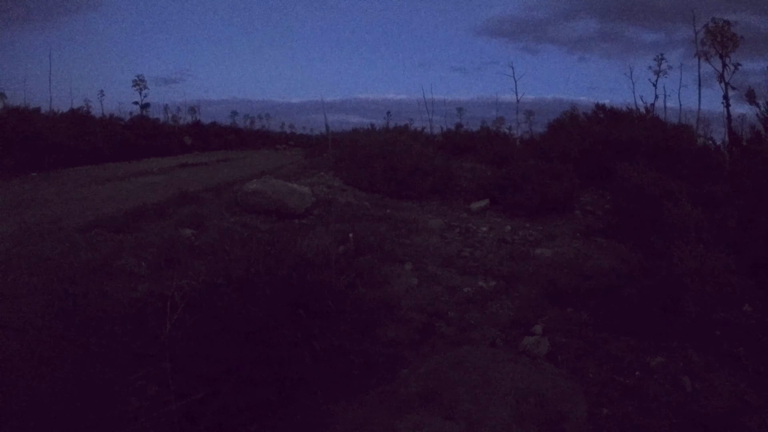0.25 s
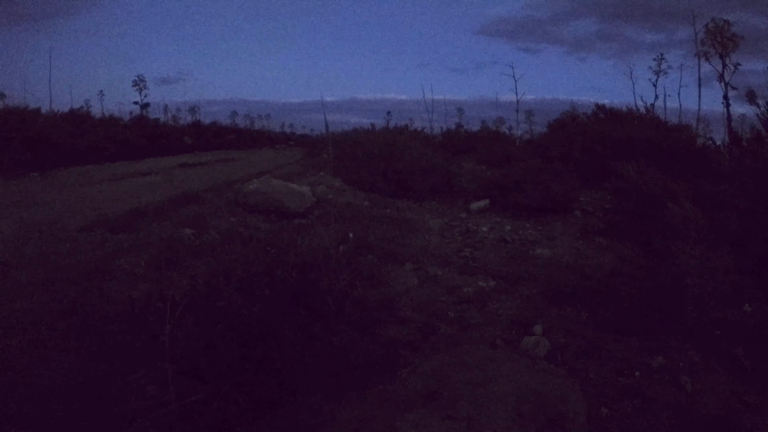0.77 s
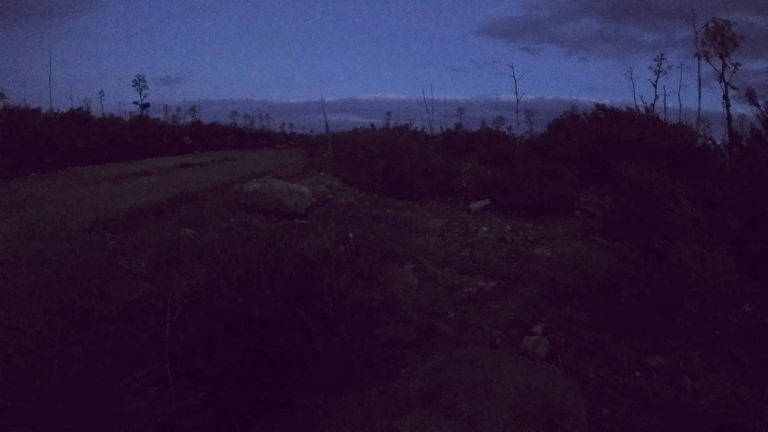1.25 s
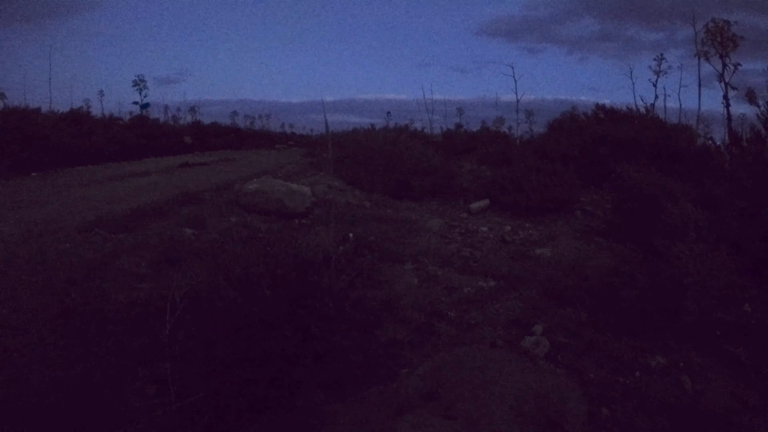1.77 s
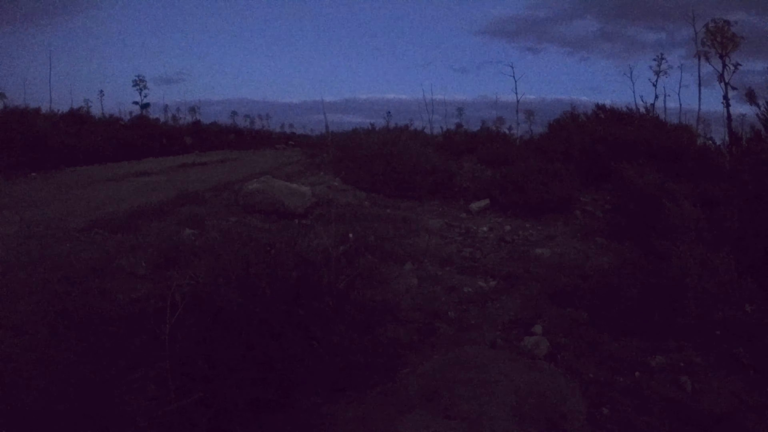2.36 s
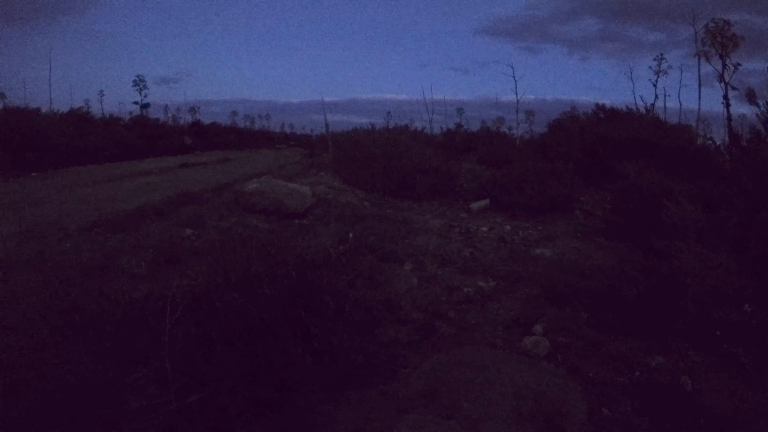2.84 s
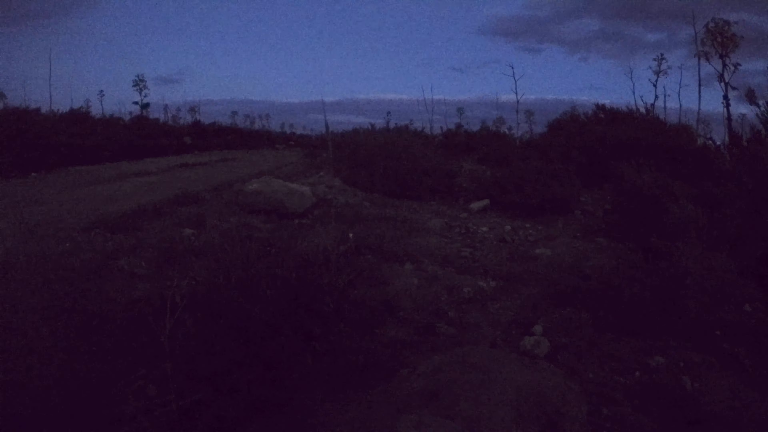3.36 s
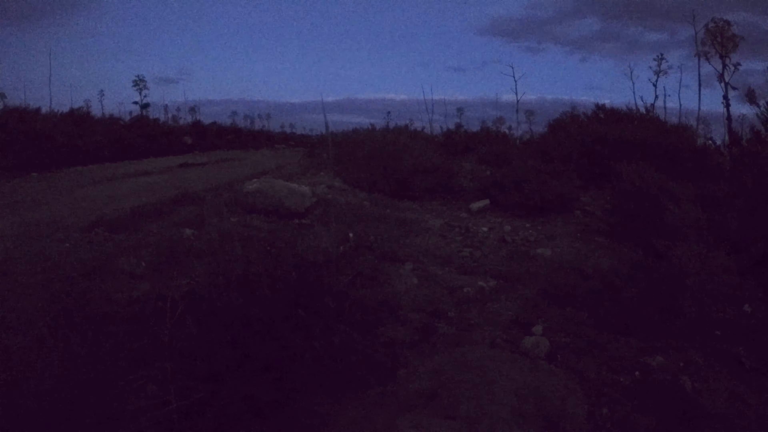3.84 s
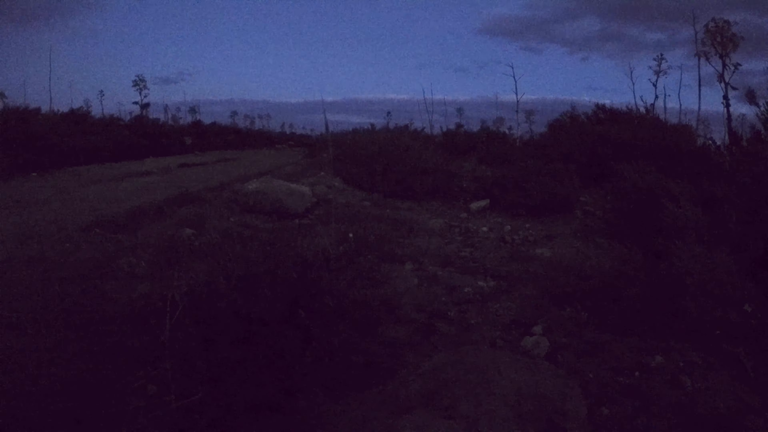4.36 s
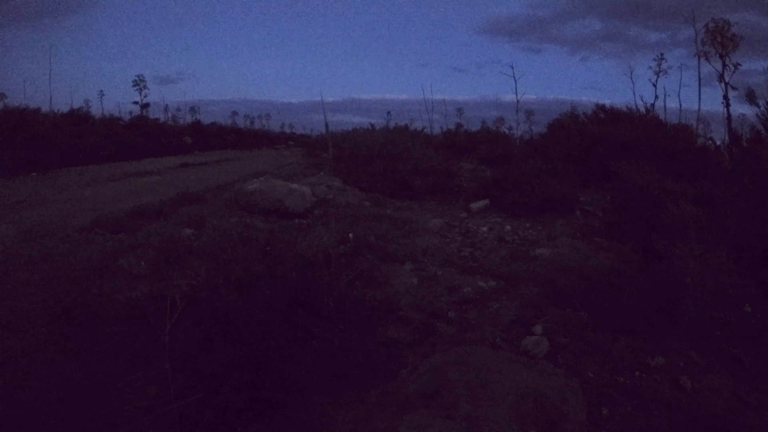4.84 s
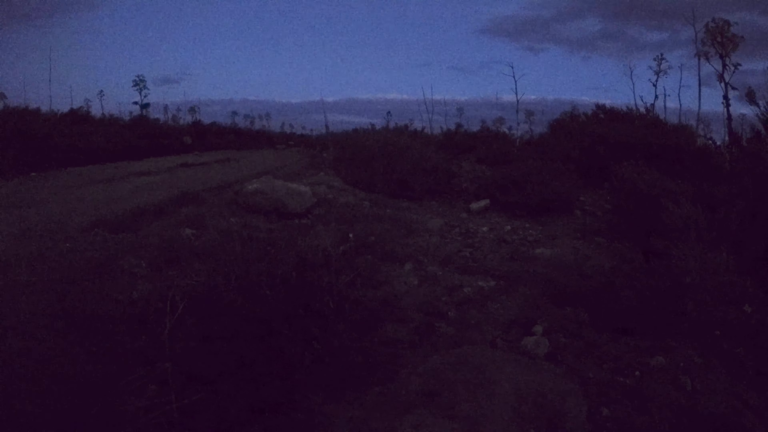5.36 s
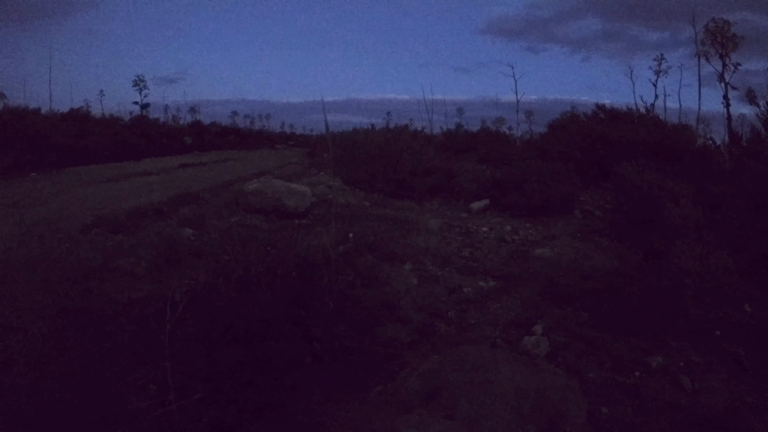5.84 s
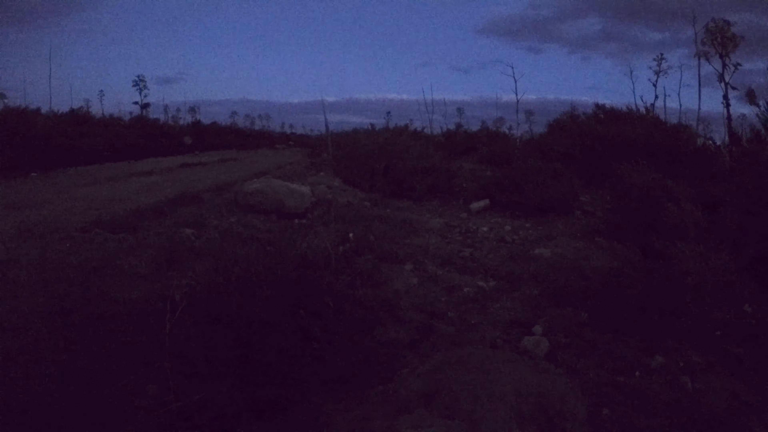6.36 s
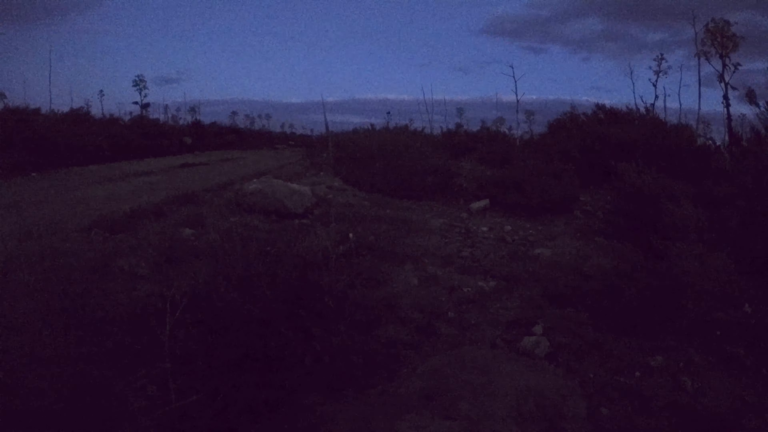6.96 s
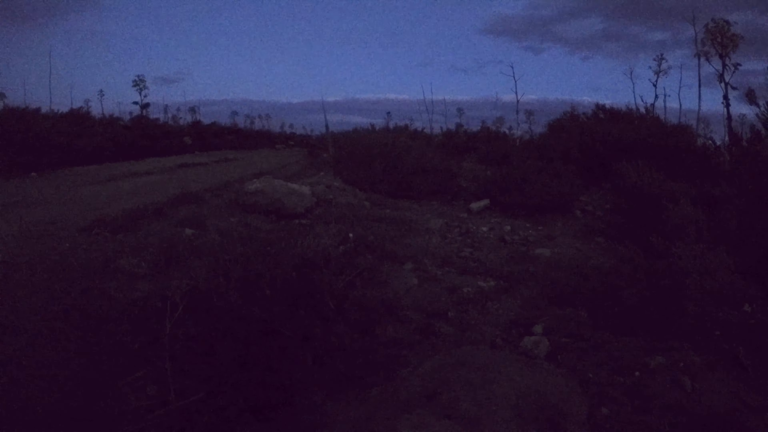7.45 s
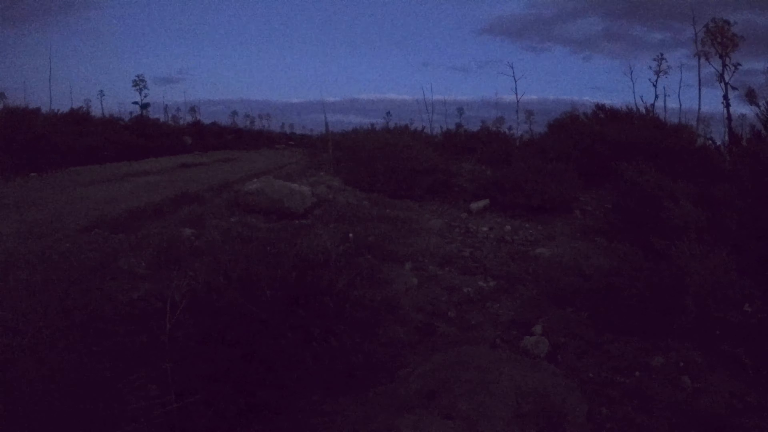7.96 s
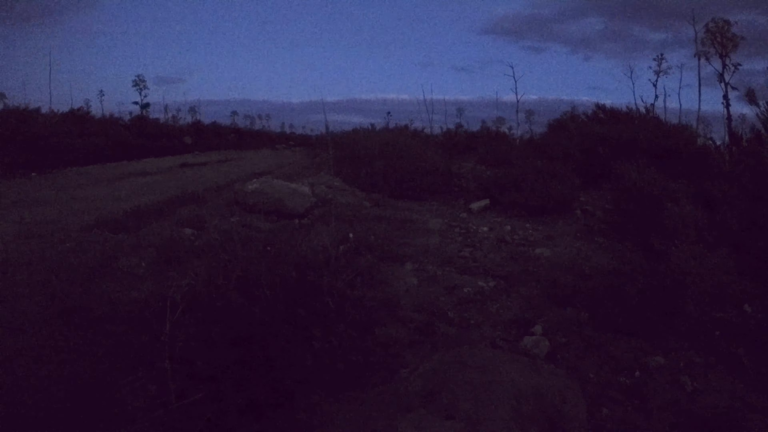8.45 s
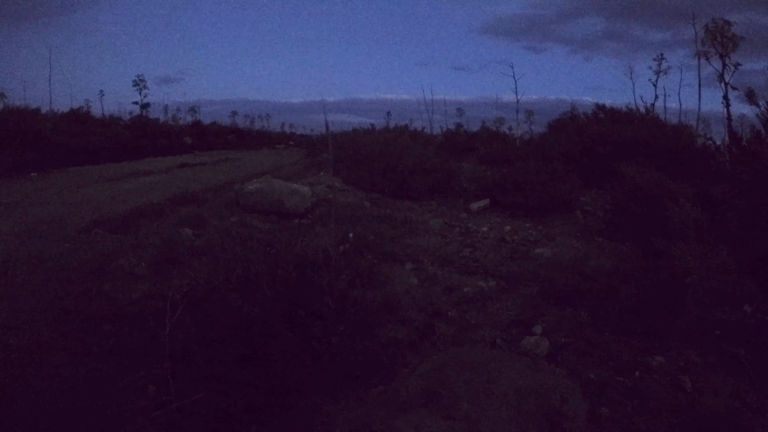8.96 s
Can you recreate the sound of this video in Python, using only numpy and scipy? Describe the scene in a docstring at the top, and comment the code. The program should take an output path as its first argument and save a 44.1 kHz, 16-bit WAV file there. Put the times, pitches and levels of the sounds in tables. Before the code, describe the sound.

Right at the microphone in open scrubland at dusk, an animal sniffs rapidly, short whistling puffs around six or seven a second with hissing air. The run ends abruptly after four seconds. After a brief lull, its muzzle bumps and rubs the housing: dry gritty clacks with short, hollow drum-like resonance, crowded at first, then a pause and a last shorter cluster. Low air flutter and faint hiss lie underneath.

```python
"""An animal sniffs in quick, whistling strokes, right at a camera standing in scrubland at dusk. Turbulence and
a nostril whistle ring the nose, under a hissing jet. A few touches fall among the sniffs. After the sniffs it
nudges and rubs the housing: gritty clacks over decaying modes of a small hollow drum. Under it lie a low
flutter of air on the microphone with the slow throb of the swaying mount, a soft rush and a faint hiss, all
shaped noise but for the throb. Two microphone ports hear it in stereo."""
import sys
import numpy as np
from scipy import signal
from scipy.fft import rfft, irfft, next_fast_len
from scipy.io import wavfile
from scipy.ndimage import uniform_filter1d, map_coordinates

SR = 44100
rng = np.random.default_rng(int(sys.argv[2]) if len(sys.argv) > 2 else 0)


def unload_wav(signal):
    """Save mono or channel-first audio to the path in sys.argv[1] as 16-bit WAV at rate SR, clipped to [-1, 1]."""
    wavfile.write(
        sys.argv[1],
        SR,
        np.round(np.clip(np.atleast_2d(signal).T, -1, 1) * 32767).astype(np.int16),
    )


N = 405713
T = np.arange(N) / SR

# One row a sniff: start_s, length_s, crest_s (time to full flow), strength_db, flare_db (upper partials
# against the body), whistle (clean share 0-1, before it grows in the fall), top_hz (before the waver)
SNIFF_STROKES = [(0.026, 0.1, 0.0147, -21.5, -8.5, 0.12, 554), (0.142, 0.14, .107, -21, -1.5, 0.23, 533),
                 (0.423, 0.12, .024, -26, 8.5, 0.3, 541.7), (0.478, 0.084, 0.024, -21.5, 13.5, 0.53, 506),
                 (.682, 0.098, .016, -17, 5, 0.3, 516), (0.726, 0.086, .042, -19.5, 9, 0.32, 490),
                 (0.931, 0.085, .018, -22, 12, 0.67, 497), (1.109, 0.11, 0.016, -23, 8.5, 0.38, 472),
                 (1.221, 0.094, 0.0385, -16.5, 5, 0.77, 524.6), (1.425, 0.093, 0.023, -19, 8, 0.84, 543.6),
                 (1.603, 0.098, 0.01846, -17, 1, 0.3, 600), (1.725, .11, 0.063, -12, -1, 0.59, 610),
                 (1.956, 0.1, .022, -19, 7.5, 0.68, 560), (2.142, 0.074, 0.019, -17.5, 4.5, 0.13, 500),
                 (2.266, 0.061, 0.0056, -17, -18, 0.2, 460), (2.325, 0.14, .088, -12.5, -1.5, 0.2, 593),
                 (2.576, 0.083, 0.0168, -18, 7.5, 0.69, 518), (2.613, 0.07, 0.0286, -20, 6, 0.17, 470.4),
                 (2.782, 0.072, .016, -15.5, -3.5, 0.65, 532.6), (2.9, 0.056, 0.01, -17.5, -20, 0.2, 432),
                 (2.958, .16, .131, -13.5, -6.5, 0.3, 615), (3.258, 0.084, .0185, -17.5, 7.5, 0.03, 505),
                 (3.301, 0.061, 0.0196, -18, 6.5, 0, 454), (3.474, .094, 0.0153, -17.5, 3, 0.43, 578),
                 (3.596, 0.084, 0.045, -13, -3, 0.65, 571), (3.817, 0.089, 0.021, -17.5, 4, 0.8, 575),
                 (3.996, 0.08, .016, -20, 3, 0.77, 555.5), (4.121, 0.069, 0.013, -28.5, -14, 0, 462),
                 (4.185, 0.22, 0.17, -19.5, -4.5, 0.18, 520)]


def sniffing(linger_hz=735, linger_db=-7):
    """The whole run of sniffs; the housing rings on faintly after each."""
    out = np.zeros((2, N))
    for row in SNIFF_STROKES:
        add(out, *sniff(*row))
    linger = resonate(out, linger_hz, width=16)
    return out + amp(linger_db) * linger


# Resonances of the nose, before the tuning of the muzzle: frequency_hz, level_db
NOSE_COLOUR = [(300, -22.5), (530, -6), (680, -5.5), (790, 1), (1000, -7), (1350, 3), (1520, -7.5),
               (1670, -22.5), (2200, -55), (5000, -101.5)]
# Colour of the jet at the nostrils, before its tuning and glide: frequency_hz, level_db
NOSTRIL_COLOUR = [(1200, -14), (1800, 10.5), (2300, -14), (3200, -1.5), (3650, -17.5), (4200, 4.5),
                  (4700, -11), (5900, 7), (6700, -27), (8700, -20.5), (13000, -49.5)]
# Colour of a jet that spreads wide: frequency_hz, level_db
SPRAY_COLOUR = [(2400, -4), (4800, 0), (6900, -3.5), (8200, 1), (11000, -38)]
# How the muzzle is held: time_s, nose_tuning (ratio), jet_tuning (ratio), jet_at_ports_db, spray (share 0-1)
MUZZLE_HOLD = [(.04, 1.15, 0.96, -3, 0.03), (.19, 0.83, 0.61, -11, 0.05), (.25, 1.09, 0.63, -1.5, 0.2),
               (.46, 1.08, 1.04, -9.5, 0.17), (1.2, 1.01, 1.052, -4, 0), (4.05, 1, 1, -.5, 0.03),
               (4.13, 0.84, 0.61, -2.5, 0.3), (4.37, 1.13, .92, 1.5, 0.29)]
JET_DB, JET_PER_FLARE = -21, 0.47  # jet against the strength, dB; its growth in dB per dB of flare
JET_GLIDE = 0.035  # share by which the jet's resonances lie lower at either end of the stroke
RAGGED_DB = 2  # the flow of a breathy stroke falters
# The whistle starts at START_HZ; after its top it loses the share END_DROP in FALL_S or less
START_HZ, END_DROP, FALL_S = 391.3, 0.6, 0.058


def sniff(start, length, crest, strength_db, flare_db, whistle, top_hz):
    """One stroke of air: turbulence and a nostril whistle, whose pitch follows the flow, ring the nose."""
    t = np.arange(0, length, 1 / SR)
    times, *held = np.transpose(MUZZLE_HOLD)
    tuning, jet_tuning, aim_db, spray = (np.interp(start + t, times, column) for column in held)
    nose = [(hz * tuning.mean(), db) for hz, db in NOSE_COLOUR]

    # the flow opens, falters and closes
    rise = np.clip(t / crest, 0, 1)
    fall = np.clip((t - crest) / (length - crest), 0, 1)
    opening = np.sin(np.pi / 2 * np.clip(t / 0.016, 0, 1))
    closing = np.sin(np.pi / 2 * np.clip((length - t) / 0.029, 0, 1)) ** 2
    gate = opening * closing * amp(RAGGED_DB * (1.5 - whistle) * wobble(len(t), 90))
    # the pull holds for a while, then slackens to a weak tail
    slack = 1 - 1 / (1 + (np.maximum(t - crest, 0) / 0.034) ** 4)

    # the whistle arches: it climbs as the air speeds up, then slides down ever faster
    top_s = np.hypot(crest, 0.013)
    climb = np.sin(np.pi / 2 * np.clip(t / top_s, 0, 1) ** 2) ** 2
    sink = np.maximum(t - top_s, 0) / min(FALL_S, length - top_s)
    arch = (START_HZ + (top_hz - START_HZ) * climb) * (1 - END_DROP) ** (sink ** 1.5)
    pitch = arch * (1 + 0.012 * wobble(len(t), 120))
    clean = np.clip(whistle * (1 + 0.43 * fall), 0, 0.95) / (1 + sink ** 10)

    # turbulence fills the nose between the partials
    eddies = shape(rng.standard_normal(len(t)), lambda hz: 1 - 1 / (1 + (hz / 560) ** 8))
    eddies = glide(colour(eddies, NOSE_COLOUR), tuning)
    dull = shape(eddies, lambda hz: 1 / (1 + (hz / 1050) ** 12))
    low_tone = whistling(pitch, [(1, -5.5), (2, 1.5)], nose)
    low = np.sqrt(clean) * low_tone + np.sqrt(1 - clean) * steadied(dull)
    high_tone = whistling(pitch, [(3, 0), (4, -3)], nose)
    high = np.sqrt(clean) * high_tone + np.sqrt(1 - clean) * steadied(eddies - dull)

    # the nostril flares at the height of the stroke, letting the upper partials and the jet through
    shut_db = -15 * (1 - rise ** 5.4)
    body = unit(low * gate * amp(4.9 * rise - 4.8 * fall - 5.4 * slack))
    bright = amp(flare_db) * unit(high * gate * amp(shut_db - 19.0 * slack))

    # the jet is unlike at the two ports; its colour glides with the flow, and broadens as it spreads
    slide = jet_tuning * (1 - JET_GLIDE * (1 - rise + fall))
    narrow = np.array([glide(side, slide) for side in colour(pair(len(t), 0.77), NOSTRIL_COLOUR)])
    wide = colour(pair(len(t), 0.56), SPRAY_COLOUR)
    jet = np.sqrt(1 - spray) * narrow + np.sqrt(spray) * wide
    jet = unit(jet * gate * amp(-17 * (1 - rise) ** 1.4 - 59 * fall ** 2))
    jet_db = JET_DB + JET_PER_FLARE * flare_db + aim_db
    return start, amp(strength_db) * (body + bright + amp(jet_db) * jet)


def whistling(pitch, partials, nose):
    """Whistle partials (multiple, dB), each louder as it crosses a resonance of the nose."""
    turns = 2 * np.pi * np.cumsum(pitch) / SR
    tone = np.zeros(len(pitch))
    for k, db in partials:
        hz = k * pitch
        level = amp(db + read(nose, np.maximum(hz, START_HZ))) / (1 + (hz / 1650) ** 20)
        tone += level * np.cos(k * turns + 2 * np.pi * rng.random())
    return unit(tone)


# One row a nudge on the housing: start_s, clack_db, ring_db (wall), boom_db (hollow)
HOUSING_NUDGES = [(0.14, -42, -13, -16), (0.265, -35, -21, -6.5), (4.4, -26, -18, -22.5),
                  (5.169, -18, -18, -20.5), (5.214, -34, -21, -33), (5.278, -40, -21, -37),
                  (5.329, -18, -11, -14), (5.441, -17.5, -15.5, -20), (5.508, -14, -12, -26),
                  (5.638, -27.5, -7.5, -22), (5.675, -26, -9.5, -11), (5.819, -20.5, -14, -10.5),
                  (5.947, -17, -9.5, -8), (5.979, -15.5, -6, -4), (6.003, -20, -6, -12.5),
                  (6.089, -14, -8, -12), (6.109, -14.5, -9, -16), (6.143, -23, -8, -29.5),
                  (6.197, -20.5, -18.5, -29), (6.215, -13, -8.5, -6.5), (6.491, -25, -17.5, -24.5),
                  (6.523, -23, -18.5, -25), (6.627, -20.5, -11, -14), (6.688, -26.5, -24.5, -24),
                  (6.758, -18, -18.5, -16), (6.775, -19.5, -14, -10), (6.826, -15, -8.5, -7.5),
                  (6.84, -24, -8.5, -10), (6.898, -18.5, -9.5, -6), (6.922, -13.5, -2, 0.5),
                  (7.059, -13.5, -22.5, -5), (7.19, -32, -22, -41.5), (7.963, -20, -18.5, -14.5),
                  (8.003, -22.5, -13.5, -19.5), (8.041, -15.5, -38, -26.5), (8.156, -14.5, -12, -18),
                  (8.214, -26.5, -16.5, -12), (8.241, -15.5, -15, -21.5), (8.292, -23, -17, -35.5),
                  (8.386, -18, -10, -12), (8.484, -30.5, -26.5, -28), (8.624, -50, -32, -40)]


def nudging():
    """All the nudges of the animal on the housing."""
    out = np.zeros((2, N))
    for row in HOUSING_NUDGES:
        add(out, *nudge(*row))
    return out


# Colour of the housing shell under nudges and rubs: frequency_hz, level_db
SHELL_COLOUR = [(330, -6), (520, 1), (830, 1.5), (1050, -3), (1350, 0), (1550, -20.5), (1950, -12.5),
                (2300, -27), (2800, -29.5), (4200, -45), (12000, -89)]
# Colour of the tick of a hard contact: frequency_hz, level_db
TICK_COLOUR = [(1200, -1), (2600, -6.5), (6000, -10), (11000, -19.5)]
# Modes of the housing wall, before a random detuning: ratio (to the pitch), level_db, t60_s
WALL_MODES = [(1, 4, 0.089), (.88, -9, 0.089), (1.1, -9.5, 0.22)]
# Modes of the air inside the housing, before a random detuning: ratio (to the pitch), level_db, t60_s
HOLLOW_MODES = [(.8, -9.5, 0.13), (1, -1, 0.12), (1.2, 1, 0.073)]
# Pitch of the hollow, which changes as the muzzle leans on it: time_s, pitch_hz
HOLLOW_TUNING = [(4.4, 179.4), (5.17, 207.6), (5.33, 154.7), (5.67, 181.4), (7.1, 178), (8.1, 200.3)]
WALL_HZ = 649.2  # pitch of the housing wall
TICK_DB, TICK_GROWTH = -15, 2.6  # the tick's level at a clack of 0 dB; dB it grows for each dB of clack


def nudge(s, clack_db, ring_db, boom_db):
    """A tick and a short gritty clack, a ring of the wall and a boom of the hollow."""
    t = np.arange(SR // 4) / SR
    contact = (1 - np.exp(-t / 0.00056)) * np.exp(-t / 0.0086)
    contact = contact / contact.max()
    grit = pair(len(t), 0.93)
    clack = amp(clack_db) * colour(grit, SHELL_COLOUR) * contact
    tick = amp(TICK_DB + TICK_GROWTH * clack_db) * colour(grit, TICK_COLOUR) * contact ** 2
    wall = struck(WALL_MODES, WALL_HZ, t, spread=0.027, rise_s=0.0042)
    hollow_hz = np.interp(s, *np.transpose(HOLLOW_TUNING))
    hollow = struck(HOLLOW_MODES, hollow_hz, t, spread=0.029, rise_s=0.023)
    return s, clack + tick + amp(ring_db) * wall + amp(boom_db) * hollow


def struck(modes, hz, t, spread, rise_s, sag=0.09, sag_s=0.011):
    """Dying modes that swell under the push, starting sharp and sagging to their pitch."""
    detune = 1 + spread * rng.standard_normal(len(modes))
    bent = t + sag * sag_s * (1 - np.exp(-t / sag_s))
    ring = np.zeros(len(t), complex)
    for (ratio, db, t60), off in zip(modes, detune):
        turns = hz * ratio * off * bent + rng.random()
        ring += amp(db - 60 * t / t60) * np.exp(2j * np.pi * turns)
    ring = ring * (1 - np.exp(-(t / rise_s) ** 2))
    return ring.imag / abs(ring).max()


# One row a rub of the muzzle along the housing: start_s, length_s, level_db (at the end of the swell)
MUZZLE_RUBS = [(0.127, 0.11, -25.5), (0.345, 0.24, -32), (1.15, 0.16, -29.5), (4.061, 0.32, -32.5),
               (5.763, 0.38, -33.5), (6.47, 0.42, -41), (7.894, 0.13, -22.5), (8.198, 0.2, -29),
               (8.435, 0.18, -45)]


def rubbing(boom_db=-4):
    """Fur catches and slips on the housing, stirring both shell and hollow."""
    slips = pair(N, 0.92) * amp(2.5 * wobble(N, 300))
    hollow = colour(slips, [(60, -48.0), (130, -3.5), (190, 5.5), (240, 1.0), (330, -36.5), (5000, -120)])
    press = sum(pressure(*row) for row in MUZZLE_RUBS)
    return press * (colour(slips, SHELL_COLOUR) + amp(boom_db) * hollow)


RUB_ATTACK_S, RUB_SWELL_DB, RUB_RELEASE_DB_PER_S = 0.034, 3, 261.5


def pressure(start, length, db):
    """One rub: quick contact, a slow swell as it presses harder, a release."""
    t = T - start
    swell_db = RUB_SWELL_DB * np.clip(1 - t / length, 0, 1)
    release_db = RUB_RELEASE_DB_PER_S * np.clip(t - length, 0, 1)
    return np.clip(t / RUB_ATTACK_S, 0, 1) * amp(db - swell_db - release_db)


# Level of the air flutter on the microphone and of the mount's throb: time_s, level_db
FLUTTER_COURSE = [(0.0, -82), (0.46, -21.5), (1.05, -38.5), (1.36, -20), (1.95, -36.5), (4.15, -28.5),
                  (4.38, -19), (4.79, -33), (6.43, -41), (7.12, -27.5), (7.84, -35.5), (7.97, -20),
                  (9.2, -45.5)]
# Colour of the rumble in the flutter: frequency_hz, level_db
FLUTTER_COLOUR = [(10, -36), (26, -2), (48, -17), (80, -16), (110, -33), (200, -34.5), (500, -67),
                  (4000, -110)]


def flutter(throb_hz=24.8, throb_db=-1, gust_db=-6, lumps_db=3.0):
    """Air flutters on the microphone in a lumpy rumble, while the camera's mount sways in a slow, wavering
    throb."""
    wavering_hz = throb_hz * (1 + 0.0483 * wobble(N, 5.28))
    throb = unit(np.sin(2 * np.pi * np.cumsum(wavering_hz) / SR))
    rumble = amp(gust_db + lumps_db * wobble(N, 4.5)) * diffuse(FLUTTER_COLOUR)
    return curve(FLUTTER_COURSE) * (amp(throb_db) * throb + rumble)


# Level of the soft rush, before its unevenness: time_s, level_db
RUSH_COURSE = [(5.1, -52.5), (5.3, -38.5), (6.05, -36), (6.75, -40.5), (7.05, -44.5), (7.9, -35.5),
               (8.3, -49.5), (8.55, -58)]
# Colour of the rush: frequency_hz, level_db
RUSH_COLOUR = [(90, -23), (200, -2), (420, -12), (660, 1), (880, -6), (1380, -3), (1520, -21.5),
               (9000, -79.5)]
# Colour of the background hiss: frequency_hz, level_db
AIR_COLOUR = [(45, -17), (160, -7.5), (700, -28), (2000, -31.5), (4000, -40), (10000, -38.5),
              (14000, -53.5)]


def background(air_db=-45, uneven_db=4.0):
    """Faint hiss of the open air and a soft, uneven rush in the housing, both from noise."""
    hiss = amp(air_db) * diffuse(AIR_COLOUR)
    rush = curve(RUSH_COURSE) * diffuse(RUSH_COLOUR) * amp(uneven_db * wobble(N, 29))
    return hiss + rush


# Likeness of diffuse noise in the two channels: frequency_hz, likeness (0-1)
CHANNEL_LIKENESS = [(40, 0.79), (180, 0.28), (800, 1), (1400, 0.76), (5000, 0.27)]


def diffuse(spectrum):
    """Coloured noise whose two channels are alike to a degree that varies with frequency."""
    a, b = rng.standard_normal((2, N))
    same = lambda hz: np.clip(read(CHANNEL_LIKENESS, hz), 0, 1)
    second = shape(a, same) + shape(b, lambda hz: np.sqrt(1 - same(hz) ** 2))
    return colour(np.array([a, second]), spectrum)


# Phase between the microphone ports: frequency_hz, left_lead_rad
PHASE_BETWEEN_PORTS = [(70, 0), (180, 0.9), (300, 4.5), (600, 4), (820, 2.5), (1400, 2.5), (4500, 1.29),
                       (5100, -1)]
# Level between the microphone ports: frequency_hz, left_minus_right_db
LEVEL_BETWEEN_PORTS = [(30, -3), (140, -10.5), (185, -9), (240, 7), (480, -8.5), (660, -7), (1050, -1.5),
                       (1900, 0), (4500, -4)]


def ports(x):
    """The two ports hear the sound at different strength and phase, far out of phase in the middle range."""
    def response(hz):
        tilt = amp(read(LEVEL_BETWEEN_PORTS, hz))
        turn = np.exp(0.5j * read(PHASE_BETWEEN_PORTS, hz))
        return np.array([tilt * turn, 1 / turn]) * np.sqrt(2 / (1 + tilt ** 2))
    return shape(x, response)


def amp(db):
    """Decibels to gain."""
    return 10 ** (np.asarray(db) / 20)


def unit(x):
    """Scales to rms 1."""
    return x / np.sqrt(np.mean(x ** 2) + 1e-20)


def read(points, hz):
    """Reads a spectrum table on a log-frequency axis."""
    f, value = np.transpose(points)
    return np.interp(np.log(hz + 1), np.log(f + 1), value)


def curve(rows):
    """A level curve in dB as a gain for every sample."""
    return amp(np.interp(T, *np.transpose(rows)))


def add(mix, s, sound):
    """Mixes a sound in at time s."""
    part = mix[..., max(round(s * SR), 0):][..., :sound.shape[-1]]
    part += sound[..., :part.shape[-1]]


def shape(x, response):
    """Filters by a function of frequency."""
    size = next_fast_len(x.shape[-1] + 4096)  # room for the filter's tail
    return irfft(rfft(x, size) * response(np.fft.rfftfreq(size, 1 / SR)), size)[..., :x.shape[-1]]


def colour(x, spectrum):
    """Gives x a spectrum, at rms 1."""
    return unit(shape(x, lambda hz: amp(read(spectrum, hz))))


def wobble(size, hz):
    """Smooth random motion of rms 1, up to about hz."""
    return unit(shape(rng.standard_normal(size), lambda f: np.exp(-(f / hz) ** 2)))


def pair(size, same):
    """Two channels of white noise, partly alike."""
    a, b = rng.standard_normal((2, size))
    return np.array([a, same * a + np.sqrt(1 - same ** 2) * b])


def resonate(x, hz, width):
    """A resonance at hz, width in Hz: shifts it to zero, smooths with one pole, shifts it back."""
    turn = np.exp(2j * np.pi * hz * np.arange(x.shape[-1]) / SR)
    r = np.exp(-np.pi * width / SR)
    return 2 * (turn * signal.lfilter([1 - r], [1, -r], x / turn)).real


def steadied(x):
    """A self-sustained oscillation holds its strength: evens out most of the random swells."""
    power = uniform_filter1d(unit(x) ** 2, SR // 300)
    return unit(x / (power + 2.6) ** (1 / 3))


def glide(x, ratio):
    """Slides all the resonances of a noise by a ratio that changes from sample to sample."""
    return map_coordinates(x, [np.cumsum(ratio)], mode="mirror")


def excess(power_db, knee_db, recovery_db):
    """How far the level has been over a knee, forgotten at recovery_db a second."""
    fall = T * recovery_db
    held_db = np.maximum.accumulate(power_db + fall) - fall
    return np.maximum(held_db - knee_db, 0)


def scene(sniff_db=3.0, nudge_db=4.0, rub_db=2, flutter_db=2):
    """Everything as it reaches the two ports."""
    animal = amp(sniff_db) * sniffing() + amp(nudge_db) * nudging() + amp(rub_db) * rubbing()
    return ports(animal + amp(flutter_db) * flutter() + background())


def record(dry, quick_share=0.54, slow_share=0.39):
    """Gain control flattens the loudest moments and holds the hiss down after them; then the band limit."""
    power_db = 10 * np.log10(abs(uniform_filter1d((dry ** 2).mean(0), SR // 300)) + 1e-12)
    quick_db = quick_share * excess(power_db, knee_db=-5.0, recovery_db=78)
    slow_db = slow_share * excess(power_db, knee_db=-17.5, recovery_db=11.0)
    ducked = dry * amp(-uniform_filter1d(quick_db + slow_db, SR // 300))
    dulled = shape(ducked, lambda hz: 1 / (1 + (hz / 13800) ** 12))
    band_limit = signal.firwin(511, 14400, window=("kaiser", 9), fs=SR)  # edge in Hz
    return signal.oaconvolve(dulled, band_limit[None], "same")


dry = scene()
out = record(dry)
unload_wav(out)
```